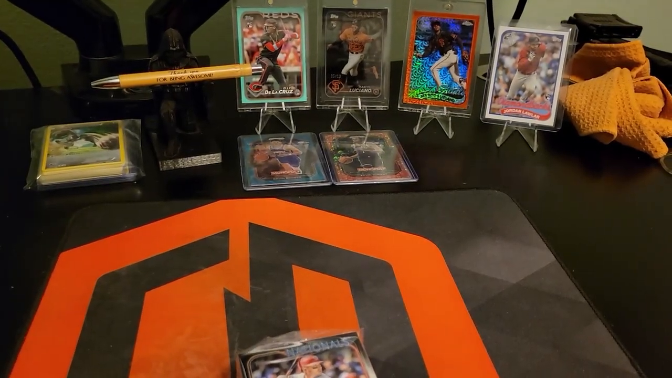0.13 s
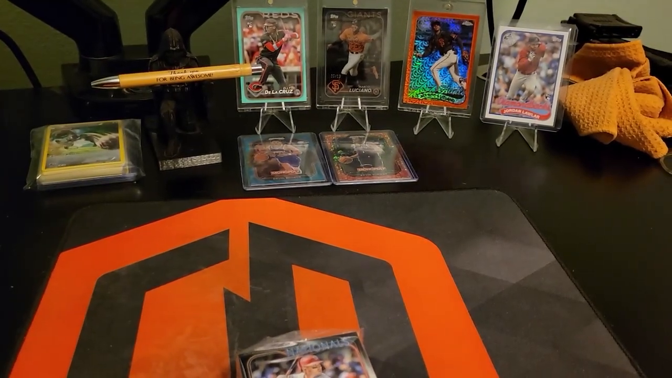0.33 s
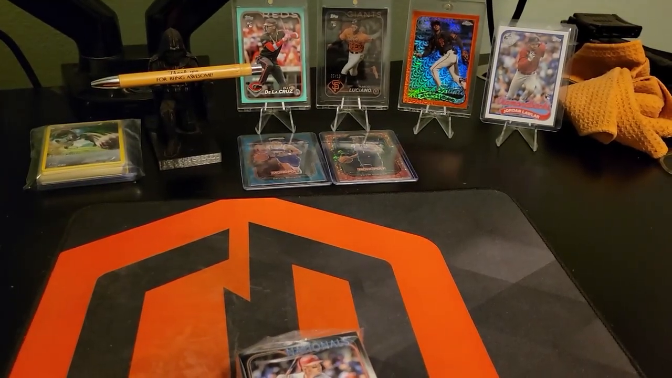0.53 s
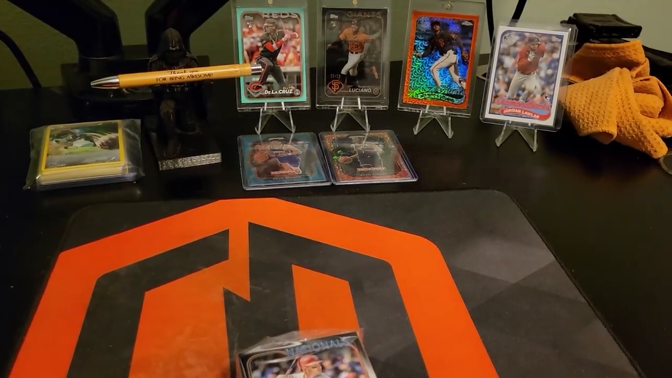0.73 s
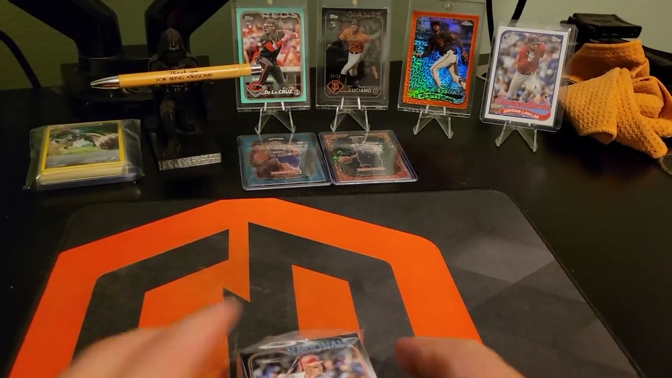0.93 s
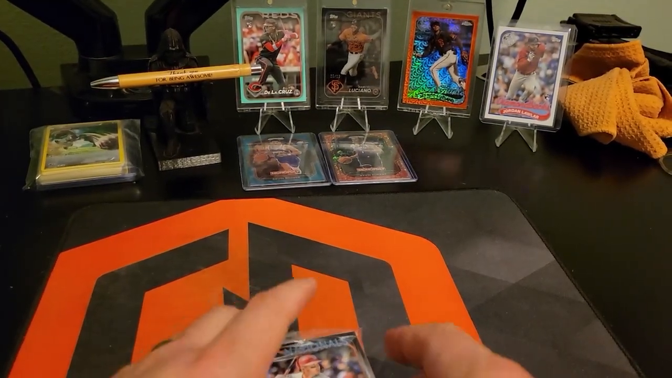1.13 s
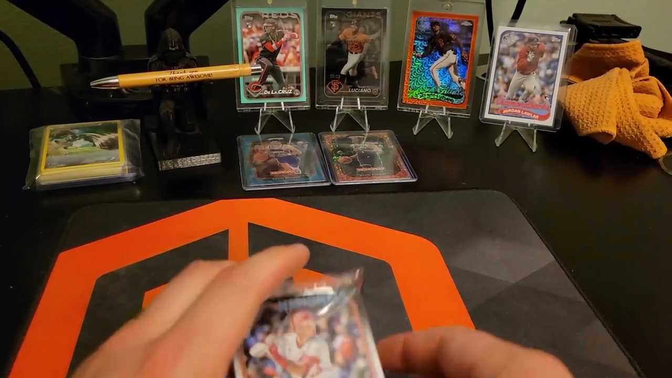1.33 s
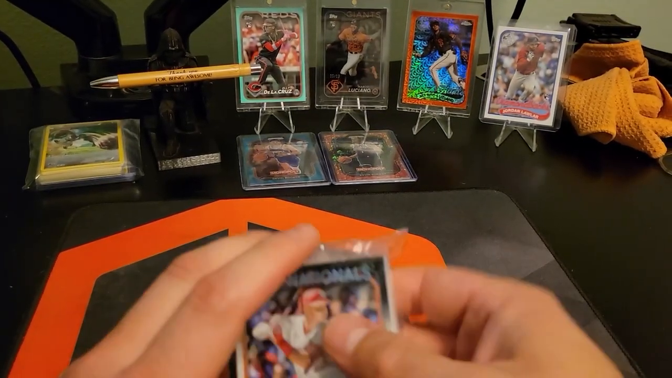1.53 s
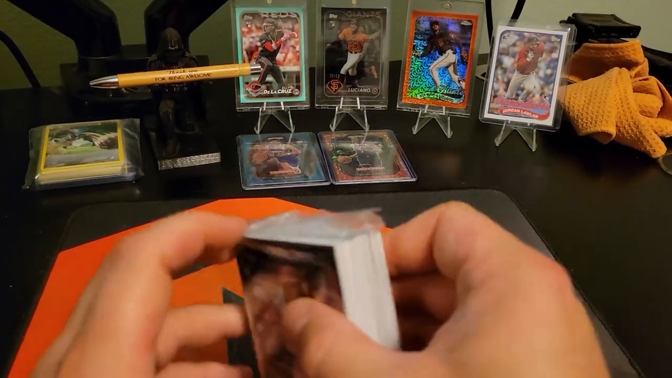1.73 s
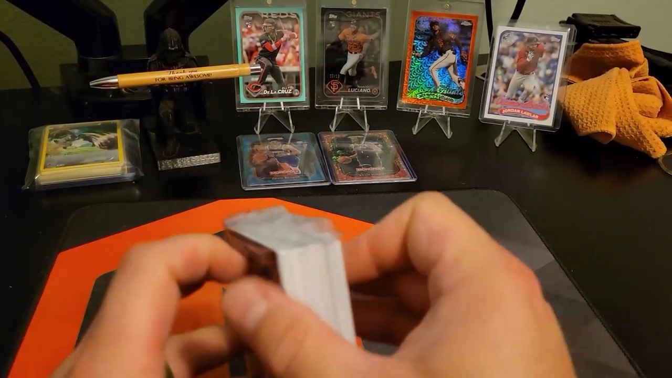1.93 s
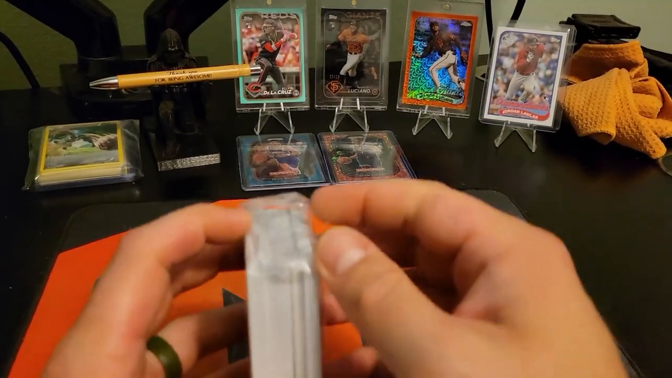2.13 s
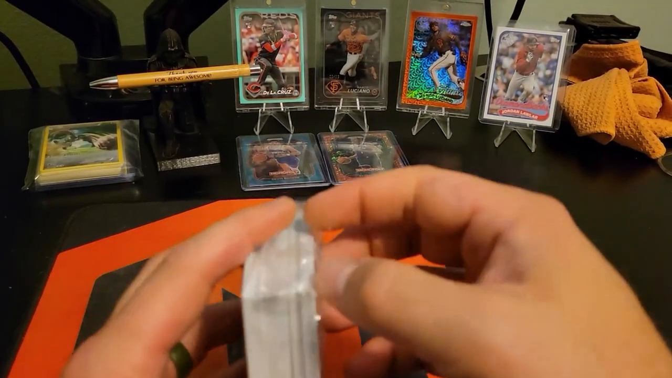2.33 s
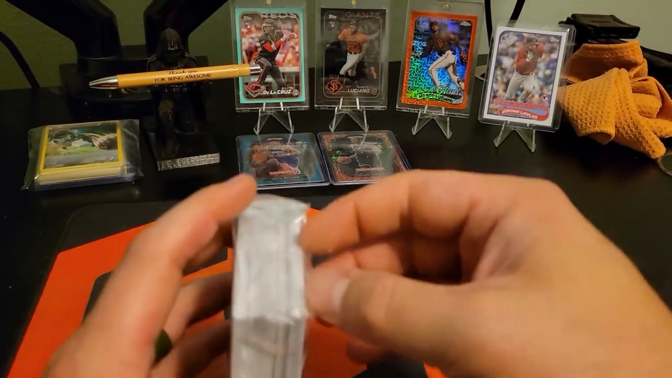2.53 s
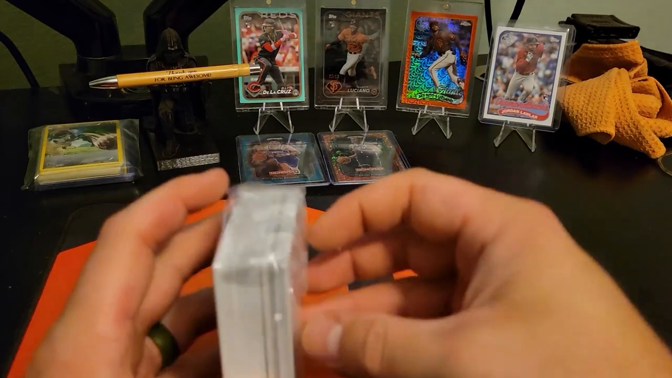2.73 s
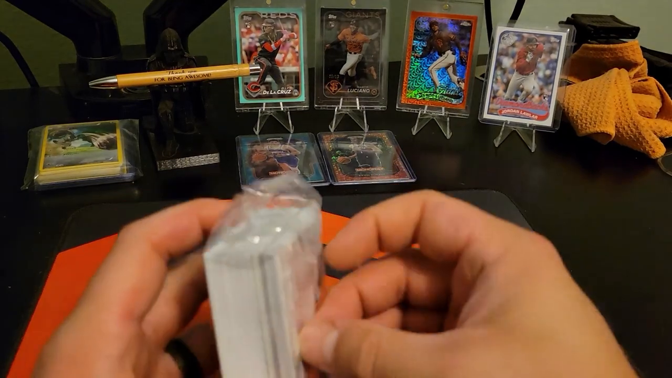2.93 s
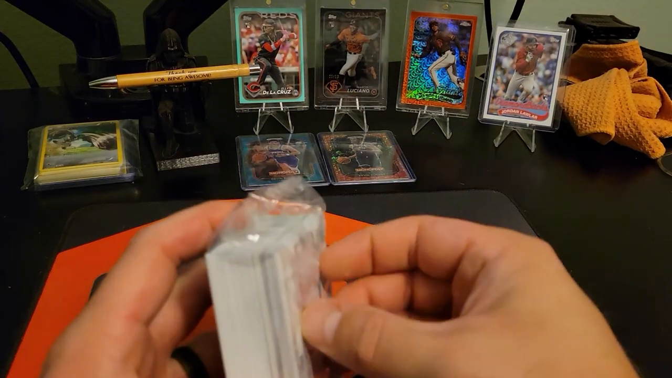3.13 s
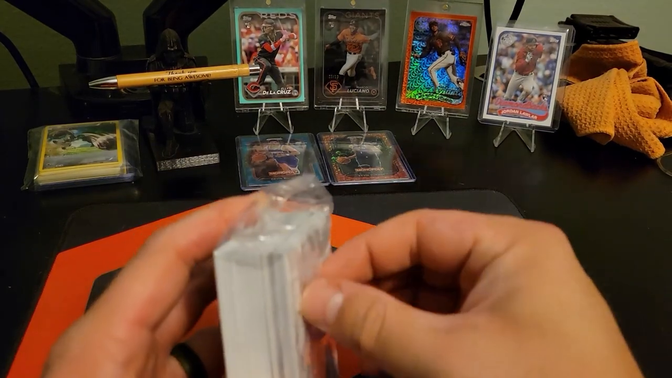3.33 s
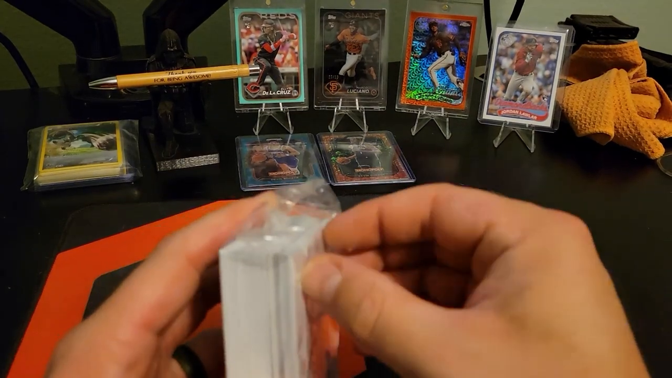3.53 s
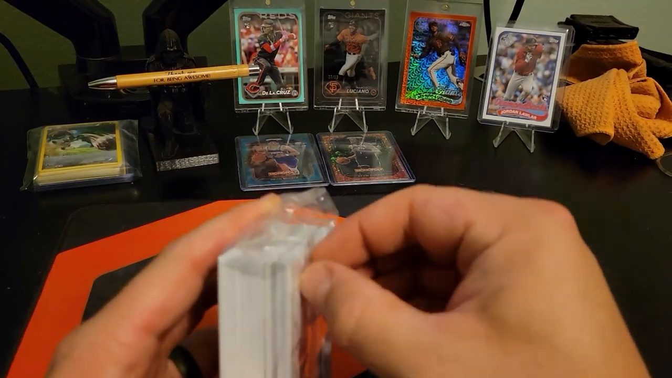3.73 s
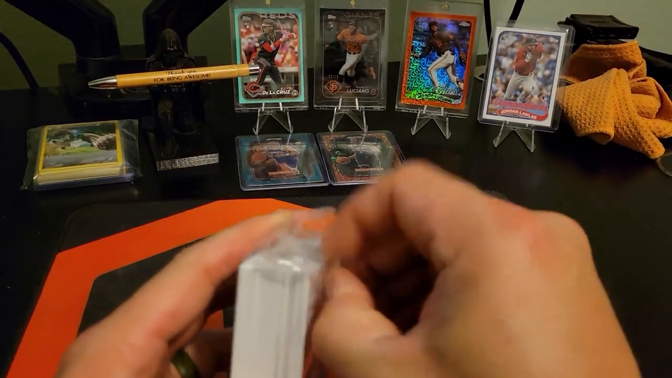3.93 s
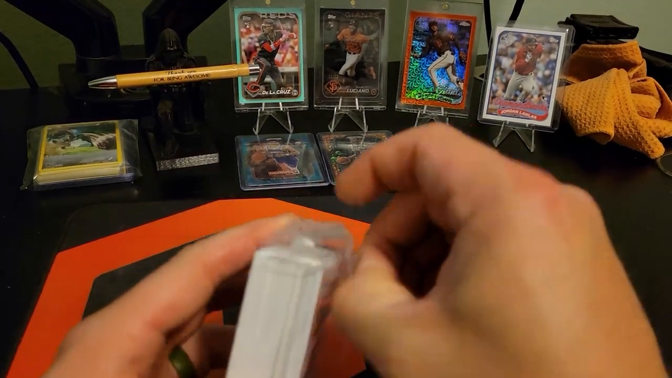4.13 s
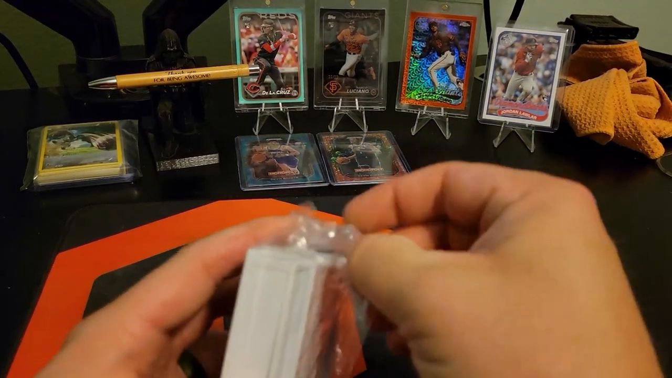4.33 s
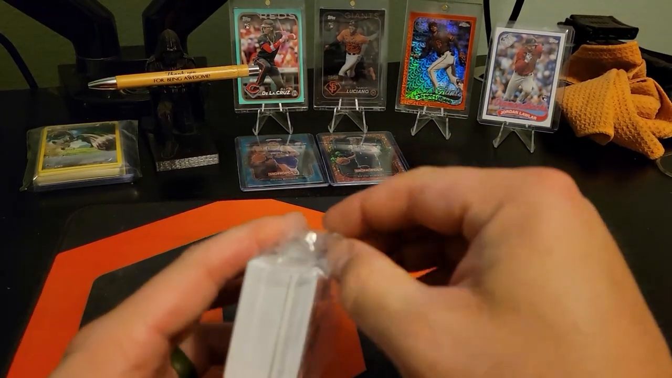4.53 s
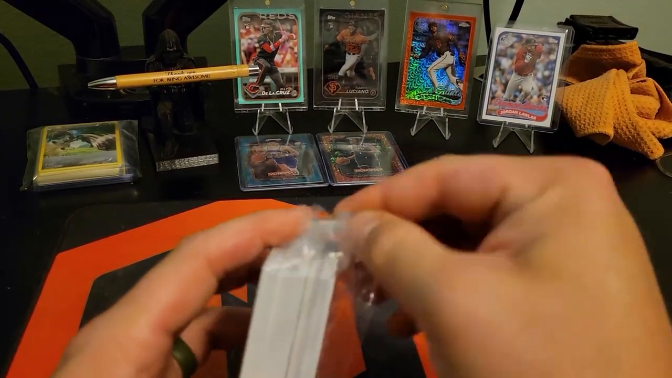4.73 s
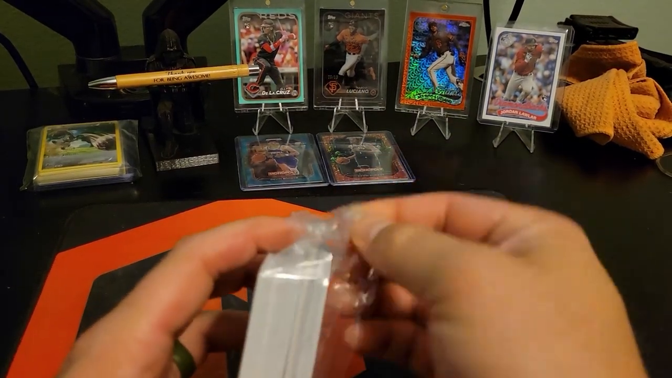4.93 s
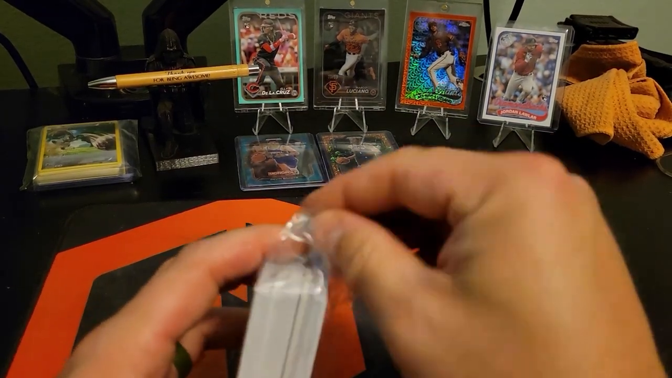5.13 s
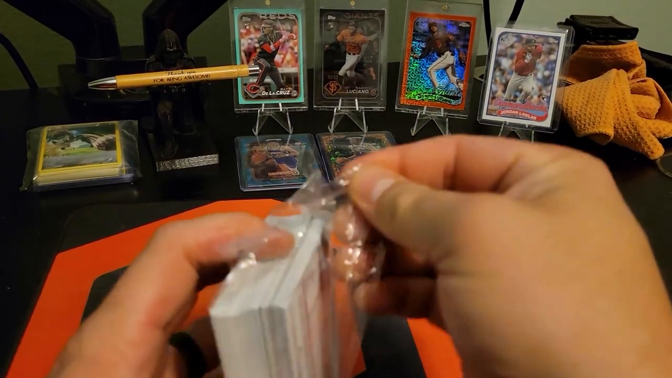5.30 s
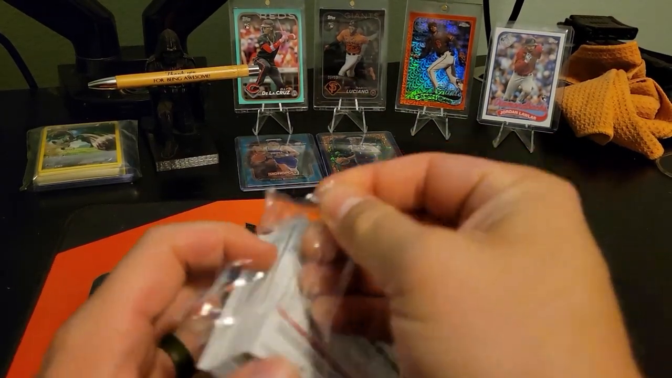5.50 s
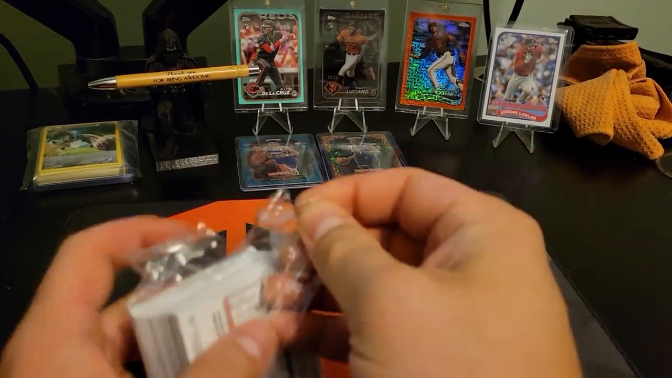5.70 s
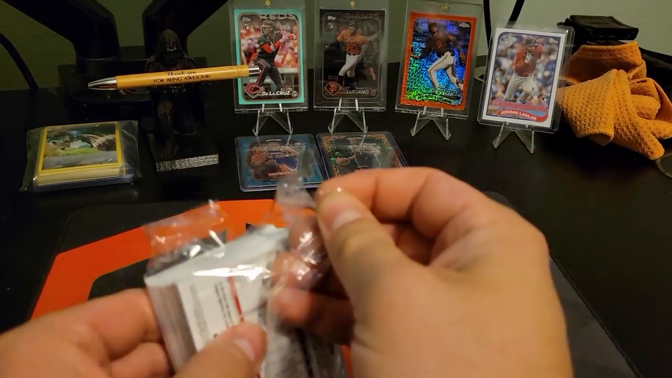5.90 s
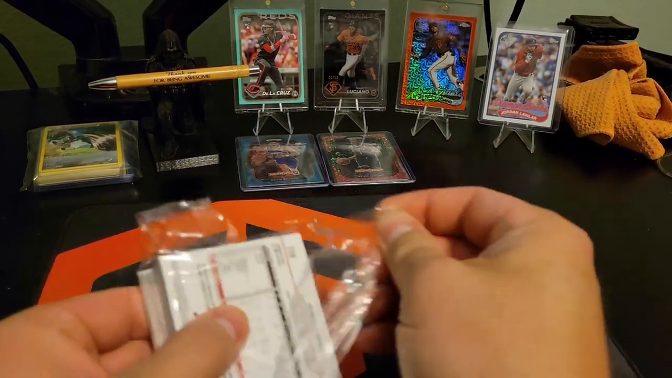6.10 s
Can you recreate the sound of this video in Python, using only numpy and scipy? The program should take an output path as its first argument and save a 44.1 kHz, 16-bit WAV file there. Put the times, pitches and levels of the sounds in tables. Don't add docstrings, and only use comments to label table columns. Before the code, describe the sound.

A card pack scrapes briefly across a desk mat, then thin plastic wrap crackles and snaps, growing from faint ticks to loud, dense tearing.

```python
import sys
import numpy as np
from scipy import signal
from scipy.fft import rfft, irfft
from scipy.io import wavfile
from scipy.ndimage import uniform_filter1d

SR = 44100
rng = np.random.default_rng(int(sys.argv[2]) if len(sys.argv) > 2 else 0)


def waveform_to_disk(signal):
    frames = np.transpose(np.atleast_2d(signal))
    scaled = np.clip(frames, -1, 1) * 32767
    samples = np.round(scaled).astype(np.int16)
    wavfile.write(sys.argv[1], SR, samples)


def boost_factor(decibels):
    exponent = np.asarray(decibels, float) / 20
    return 10 ** exponent


N = 271656
GRAIN = 512
SNAP_PAN_DB = 2


# (t/s, peak level/dB, deep part level/dB, middle
# part level/dB)
SNAPS = [(0.9328, -45, 0, 7), (0.958, -40.5, -29, -4), (1.007, -31.5, -19, -14), (1.04, -27, -4, -7),
         (1.1388, -26, -12, -3.5), (1.193, -30.5, -1, 4), (1.225, -25, -5, 0.5), (1.273, -38.5, 5, -1),
         (1.3132, -32.5, -22, -8), (1.35, -31, -3, -13), (1.397, -19.5, -8.5, -16.5),
         (1.477, -35, -27, 6), (1.483, -27.5, -36, -12), (1.5173, -24, -28, -19),
         (1.539, -20.5, -17, -6.5), (1.568, -11.5, -53, -12), (1.619, -18.5, -16, -20),
         (1.704, -25.5, -23, -26.5), (1.719, -18, -22, -4), (1.789, -30, -27, -5), (1.872, -39, -6, -18),
         (1.912, -31, -8.5, -15), (1.999, -27, -6.5, -14), (2.0204, -24.5, -16, 1.5),
         (2.056, -13, -29, -9.5), (2.0752, -25, -19, -9), (2.095, -19, -16, -10), (2.1044, -23, -37, -7),
           (2.189, -32, 0, -2), (2.2194, -26.5, -9.5, -4.5), (2.248, -20, -18, -3),
           (2.2951, -20.5, -14, -6.5), (2.334, -20, -22, -6), (2.366, -30, -49, 2),
           (2.3797, -17.5, -27, -4), (2.3981, -16.5, -4, -17), (2.4306, -12.5, -15, -12),
           (2.445, -17.5, -35, -10), (2.4717, -13, -13, -5), (2.531, -17.5, -13.5, -13),
           (2.559, -11.5, -31, -15), (2.5747, -15.5, -26, -13), (2.5926, -18, -29, -10),
           (2.6107, -20.5, -14, -11), (2.6871, -17, -19, -9.5), (2.6957, -21.5, -20, -4),
           (2.7278, -22, -17.5, 3), (2.793, -22.5, -16, -13.5), (2.8103, -15, -18, -4),
           (2.8959, -28.5, -8.5, 4),
         (2.976, -15, -6, -12.5), (2.9955, -11.5, -26, -17), (3.0279, -20.5, -9.5, -5),
           (3.116, -16, -35, -5.5), (3.1245, -17, -27, -16), (3.149, -10.5, -40, -23),
           (3.158, -15, -12, -3), (3.211, -18, -0.5, -12), (3.2817, -18, -13, -4),
           (3.3813, -18.5, -25, -22), (3.3923, -30.5, -8.5, 5), (3.4458, -25, -14, 12),
           (3.48, -23.5, -10, 1), (3.4925, -14, -26, -10), (3.5161, -9, -14, -5), (3.5557, -21, -23, -5),
           (3.59, -13.5, -26.5, -2.5), (3.727, -27, -32, -33), (3.764, -22, -48, -15),
           (3.786, -19, -44, -30), (3.7988, -23.5, -12, -1.5), (3.8189, -12.5, -45, -20),
           (3.8759, -24.5, -14, -2), (3.923, -17, -18.5, -6), (3.959, -20, -13, 0.5),
           (3.976, -19.5, -6.5, 2),
         (4.0285, -15, -19.5, -4.5), (4.038, -17.5, -33, -3), (4.0624, -24, -5, 11),
           (4.102, -17.5, -16, -1), (4.119, -13.5, -28, -13), (4.147, -16.5, -34, 2), (4.185, -26, 4.5, 6),
           (4.2042, -22, -17, 8), (4.213, -10, -19, -21), (4.225, -16.5, -1.5, 8.5), (4.256, -14, -3, 0.5),
           (4.289, -10.5, -25, -35), (4.331, -18, -22, -20), (4.3482, -17.5, -15, -13),
           (4.3625, -14.5, -23, -18), (4.4171, -16, -50, -18), (4.478, -18.5, -8, -6),
           (4.518, -17.5, -19, -1.5), (4.5375, -8.5, -13, -11.5), (4.5858, -21.5, -22, -12),
           (4.6586, -14.5, -26, -38), (4.691, -27.5, -11, 5), (4.7272, -13.5, -9, 2.5), (4.74, -9, -24, -8),
           (4.7524, -19.5, -2.5, 10.5), (4.7825, -14, -14, -1), (4.831, -18.5, -4, 4),
           (4.8445, -9, -28, -13), (4.945, -11, -29, -16), (4.9782, -10.5, -27, -27),
         (5.0029, -23.5, 8, 9), (5.031, -9, -28, -32), (5.0513, -15, -10, -12), (5.0735, -12.5, -33, -12),
           (5.1186, -18.5, -15, 3), (5.188, -18, -34, -28), (5.2173, -15.5, -8.5, 4),
           (5.241, -8, -13, -1.5), (5.2741, -14.5, -17, -6), (5.3294, -18.5, -34, -33),
           (5.365, -22.5, -0.5, 7), (5.3788, -18, -27, -18), (5.401, -15.5, -13, -3), (5.4641, -22, -8, -1),
           (5.524, -21, -15, -8), (5.583, -19.5, -17, -8.5), (5.598, -17, -12.5, -3),
           (5.6293, -24, -5.5, 5), (5.6538, -24, -49, 13.5), (5.7354, -14, -16, -10), (5.819, -25, -27, -7),
           (5.834, -15, -14, -3), (5.874, -17.5, -10.5, -12), (5.9198, -22, -21, -8),
           (5.934, -21, -36, -21), (5.955, -12.5, -21, 0), (5.999, -12, -31, -14), (6.07, -6, -12, -14),
           (6.0949, -5.5, -1.5, -16), (6.1108, -6, -27, -11.5)]


def snaps():
    rows = np.transpose(SNAPS)
    pan_db = SNAP_PAN_DB + rng.standard_normal(rows.shape[1])
    return creases(*rows, pan_db, fade_s=0.0015, sparse=0.45, patchy_db=2.0)


def swarm():
    when, size, side = rng.random((3000, 3)).T
    t = np.arange(.88, N / SR, .002)
    crowding = .2
    rate = boost_factor(2 * crowding * squeezing(t)[0])
    when = np.interp(when, np.cumsum(rate) / rate.sum(), t)
    swarm_db, deep_db = squeezing(when)
    share_db = swarm_db - 10 * np.log10(np.interp(when, t, rate) / rate.mean())
    db = share_db - 5.0 - 3.48 * np.log(size + 0.039)
    middle_db = -4.5 - 0.3123 * (swarm_db + 35.5)
    deep_own, middle_own = 2.87 * rng.standard_normal((len(when), 2)).T
    pan_db = 8 * (side - .5)
    return creases(when, db, deep_db + deep_own, middle_db + middle_own, pan_db,
                   fade_s=0.00072, sparse=0.65, patchy_db=6.5)


# (peak t/s, level/dB, rise t/s, die-away t/s, deep
# part level/dB)
SQUEEZES = [(1.033, -43, 0.057, 0.065, -11), (1.16, -50, 0.065, .3, -3.5), (1.24, -45, .09, .12, -2),
            (1.41, -59.5, 0.093, 0.24, 9), (1.611, -30.5, 0.15, 0.062, -13), (1.731, -34.5, 0.074, 0.1, -11),
            (2.065, -33.5, .1, 0.29, -10.5), (2.241, -36, 0.17, 0.076, -10), (2.46, -26, 0.14, 0.069, -14),
            (2.567, -34.5, 0.15, 0.14, -10), (2.76, -41, 0.41, 0.22, -12), (2.905, -30, 0.049, 0.038, -13.5),
            (2.987, -31.5, 0.038, 0.083, -15), (3.122, -31, 0.021, 0.13, -11.5), (3.3, -35.5, .06, .25, -11),
            (3.525, -33, 0.13, .2, -12.5), (3.807, -35.5, 0.055, 0.077, -13.5),
            (3.922, -34.5, 0.03, 0.37, -17),
            (4.111, -23.5, 0.093, 0.14, -12.5), (4.23, -28.5, 0.17, 0.23, -8.5), (4.43, -33.5, .1, .45, -14),
        (4.722, -27, .05, 0.095, -47), (4.772, -17.5, .12, .04, -6.5), (4.858, -14, 0.034, 0.043, -9.5),
        (5.075, -24, 0.18, 0.11, -7), (5.255, -16, 0.096, 0.044, -10.5), (5.471, -36, .4, 0.15, -11.5),
        (5.668, -30, 0.071, 0.05, -7.5), (5.744, -39, 0.095, 0.073, -13), (5.838, -39, 0.035, 0.069, -4),
        (5.953, -26, 0.064, 0.22, -13), (6.062, -14.5, 0.094, 0.69, -12), (6.15, -21, 0.17, .3, 10)]


def squeezing(t):
    s, db, rise, fall, deep_db = np.transpose(SQUEEZES)[:, :, None]
    swell_db = 20
    away = np.where(t < s, (s - t) / rise, (t - s) / fall)
    power = boost_factor(2 * (db - swell_db * away))
    total = power.sum(axis=0)
    return 10 * np.log10(total), (power * deep_db).sum(axis=0) / total


# (t/s, peak level/dB, deep part level/dB, middle
# part level/dB)
TICKS = [(0.9982, -39, -26, -12), (1.0197, -30.5, -22, -7), (1.165, -31.5, -18, 1),
         (1.6113, -20, -20, -22), (1.6165, -23.5, -5.5, -19), (1.9252, -30.5, -10, -11),
         (2.101, -21, -20, -13), (2.1239, -28.5, -36, -2), (2.13, -29, -28, 9),
         (2.2251, -19, -19, -17), (2.232, -26, -40, -14), (2.262, -21, -21, -15),
         (2.36, -24, -32, -17), (2.3744, -22, -15.5, -4), (2.4138, -17, -35, -3),
         (2.5003, -24, -20, -10), (2.5344, -22, -16, -6), (2.5403, -18, -34, -29),
         (2.5542, -14, -24, -11.5), (2.5652, -26, -7, -3), (2.6617, -24.5, -26, -4),
         (2.7016, -23, -25, -24), (2.7316, -29, -21, -2), (2.7408, -27, -29, -12), (2.9, -22, -20, 4),
         (2.915, -26, -19, -12), (3.1369, -22, -33, -16), (3.1614, -15, -17, -8),
         (3.171, -19, -26, -23), (3.2888, -26, -7.5, 9), (3.349, -31, -18, -7),
         (3.486, -21.5, -19, -5), (3.5041, -23, -22, 1), (3.5327, -17, -26, -14),
         (3.586, -26.5, -20, 7), (3.6037, -22, -25, -15), (3.61, -20, -24, -12),
         (3.6294, -23, -17.5, -6),
         (3.6535, -26, -12, -10), (3.717, -33.5, -12, -8), (3.768, -31, -31, -23),
                (3.812, -27, -26, -4), (3.8586, -35, -30, -25), (3.9176, -25, -9, -1),
                (3.9283, -25, -38, -20), (3.9497, -23, -31, -10), (4.072, -22, -24, -19),
                (4.107, -15, -12, -24), (4.137, -27, -3, 0), (4.157, -26, -15, -8), (4.162, -36, -22, -8),
                (4.22, -25, -6, -6), (4.2437, -19, -25, -19), (4.2625, -28, -6, 13), (4.274, -21, -7, 0),
                (4.2825, -15, -21, -19), (4.324, -22.5, -24, 0), (4.37, -26, -23, -5),
                (4.4228, -24, -36, -14), (4.447, -29, -21, -28), (4.47, -27, 2.5, -2),
                (4.704, -18.5, -20, -1), (4.7181, -15.5, -12, 6), (4.7317, -26, -8, -5),
                (4.765, -12.5, -14, -13), (4.809, -16, -4, -4), (4.8496, -10, -2.5, -4),
                (4.8705, -13, -5, 2), (4.8857, -33, -15, -2), (4.9288, -19, -9, -8),
                (4.993, -18.5, -17, -10), (5.006, -25.5, -7, 8), (5.0122, -19.5, -4, 6.5),
         (5.018, -32, -12, 10), (5.0572, -19.5, -4, 1), (5.0647, -11, -8.5, -4), (5.078, -25, -16, -5),
              (5.083, -16, -23, -13), (5.091, -11, -15.5, 0), (5.098, -29, -16, 3), (5.122, -17.5, -18, -8),
              (5.1575, -18.5, -10.5, 1.5), (5.169, -33, -13, -3), (5.2143, -18.5, -27, 4),
              (5.222, -18, -3, -9), (5.231, -23, -8, 9.5), (5.2544, -10.5, -9, -3), (5.2687, -13, -10, -13),
              (5.469, -27, -14, -10), (5.4765, -32, -28, -3), (5.4821, -30, -16, -11),
              (5.496, -37, -17, -16), (5.678, -30, -17, 10), (5.725, -27.5, -39, 2),
              (5.7593, -30, -31, -19), (5.838, -24, -8, -7), (5.9634, -25, -1, -7), (5.9864, -15, -21, -13),
              (6.028, -7, -30, -21), (6.0373, -14, -26.5, -16.5), (6.0422, -12, -20, -15),
              (6.047, -17, -20, -27), (6.051, -6, -39, -19), (6.062, -8, -27, -23), (6.067, -13, -9, -24),
              (6.085, -6, -15, -18), (6.101, -12, -29, -20), (6.117, -11, -25, -23), (6.125, -6, -27, -18),
              (6.134, -12, -25, -22), (6.143, -10.5, -23, -21)]


def separate_ticks():
    return ticks(TICKS)


# (t/s, peak level/dB, deep
# part level/dB, middle part level/dB)
MORE_TICKS = [
    (1.365, -44, 10, 6),
    (1.437, -40.5, 6, -6),
]


def more_ticks():
    return ticks(MORE_TICKS)


def ticks(table):
    rows = np.transpose(table)
    pan_db = SNAP_PAN_DB + rng.standard_normal(rows.shape[1])
    return creases(*rows, pan_db, fade_s=0.0012, sparse=0.65, patchy_db=6.5)


# (f/Hz, level/dB)
FILM = [(130, -39), (450, -18), (1100, -9), (1800, -1.5), (2400, -1.5), (3250, 6.5), (4000, 2), (6500, 4.5),
        (15000, 0)]
# (t/s, left over right level/dB)
HANDS_PAN = [
    (1.2, -2.5),
    (1.75, 0),
    (2.25, 0.5),
    (3.2, -3),
    (4.2, 0.7),
    (4.75, -0.5),
    (5.5, -0.5),
]


def creases(s, db, deep_db, middle_db, pan_db, fade_s, sparse, patchy_db):
    peak_s = .003
    t, hz = np.arange(GRAIN) / SR - peak_s, np.fft.rfftfreq(GRAIN, 1 / SR)
    chance = rng.standard_normal((len(s), 4, GRAIN))
    fade = fade_s * np.exp(.3 * chance[:, 3, :1])
    away = np.where(t < 0, -1.07 * t, t)
    slips = np.exp(sparse * chance[:, 2] - away / fade)
    slips *= 1 + 1.24 * np.exp(-np.abs(t) / 0.0002)
    burst = apart(slips * chance[:, :2].transpose(1, 0, 2), alike_hz=4100)
    patch = uniform_filter1d(uniform_filter1d(chance[:, 3, :len(hz)], size=11), size=11)
    colour = curve(FILM, hz) + patchy_db * unit(patch)
    deep = 1 / (1 + (hz / 2000) ** 4)
    high = 1 / (1 + (5500 / (hz + 1)) ** 6)
    parts = np.array([deep, 1 - deep - high, high])
    power = (np.abs(rfft(burst)) ** 2).mean(axis=0) * boost_factor(2 * colour)
    given_db = 10 * np.log10(power @ parts.T / GRAIN)
    wanted_db = db[:, None] + np.c_[deep_db - 1.1, middle_db - .6, 0 * db] + 12.5
    grains = causal(burst, colour + (wanted_db - given_db) @ parts)
    pan_db = pan_db + np.interp(s, *np.transpose(HANDS_PAN))
    start = np.round((s - peak_s) * SR).astype(int)
    at = (start[:, None] + np.arange(GRAIN)).ravel()
    ports = []
    for grain, side in zip(grains, (1, -1)):
        panned = grain * boost_factor(side * pan_db / 2)[:, None]
        ports.append(np.bincount(at, panned.ravel(), N + GRAIN)[:N])
    return np.array(ports)


# (t/s, peak level/dB, f/Hz, 60 dB fade t/s)
POPS = [
    (1.26, -49, 865, 0.025),
    (1.27, -29.5, 1500, 0.007),
    (4.134, -32, 1300, .018),
    (4.223, -15.5, 1800, 0.024),
    (5.627, -27, 1680, .015),
]


def pops():
    return knocks(POPS)


# (t/s, peak level/dB, f/Hz, 60 dB fade t/s)
BUMPS = [
    (0.263, -37, 523, 0.2),
    (.447, -52.5, 350, 0.21),
    (.542, -41, 179, 0.29),
    (2.622, -42, 120, 0.018),
    (2.704, -55.5, 45.4, 0.16),
    (2.809, -28, 696, 0.0028),
    (3.001, -56, 82.7, 0.11),
    (4.099, -31.5, 335, 0.023),
    (5.674, -42.5, 180, 0.067),
    (6.048, -43, 200.5, 0.11),
]


def bumps():
    return knocks(BUMPS)


def knocks(table):
    out, t = np.zeros(N + SR), np.arange(SR // 2) / SR
    grown = np.minimum(t / .02, 1)
    for s, db, hz, t60 in table:
        drift = rng.standard_normal((2, len(t)))
        size, phase = [unit(uniform_filter1d(uniform_filter1d(v, size=300), size=300)) for v in drift]
        ring = np.sin(2 * np.pi * hz * t + 0.47 * grown * phase) * boost_factor(5.5 * grown * size)
        ring *= np.exp(-np.log(1000) * t / max(t60, .002))
        ring *= 1 - np.exp(-t / min(0.036 * t60, .004))
        out[int(s * SR):][:len(t)] += boost_factor(db - 0.5) * ring
    return out[:N]


def card_stack(near):
    hum = signal.lfilter(*signal.iirpeak(357, 8, fs=SR), near)
    return boost_factor(0.5) * hum * (np.arange(N) > SR)


# (t/s, desk shake level/dB, scrape level/dB)
PUSH = [
    (0.023, -67, -68),
    (0.039, -48.5, -41.5),
    (0.08, -33.5, -50),
    (.12, -32.5, -61),
    (.15, -37, -41.5),
    (.21, -47.5, -43.5),
    (0.283, -40.5, -44),
    (.372, -56.5, -56.5),
    (.434, -62.5, -59),
]
NUDGE = [
    (.495, -60, -54.5),
    (.515, -49, -50),
    (.555, -51.5, -57),
    (.6, -63.5, -63.5),
    (.75, -93, -99),
]
# (f/Hz, width f/Hz, level/dB)
DESK = [(147.4, 16, 4.5), (180, 5.4, 7), (222.5, 6.5, 6.5), (260, 30, 4), (300, 40, -2), (347, 33, 2),
        (523, 180, 0), (755, 420, -3), (1370, 460, -8.5)]
# (f/Hz, level/dB)
MAT = [(290, -47), (500, -28), (994, -26), (3210, -25), (7820, -32), (12700, -29.5), (15800, -34.5)]


def slide():
    ts, shake_db, scrape_db = np.transpose(PUSH + NUDGE)
    t = np.arange(N) / SR
    rough = rng.standard_normal(N) * boost_factor(2.5 * unit(uniform_filter1d(rng.standard_normal(N), size=600)))
    push_db = np.clip(np.interp(t, ts, shake_db) + 38, 0, None)
    desk = np.zeros(N)
    for hz, width, db in DESK:
        mode = signal.lfilter(*signal.iirpeak(hz, hz / width, fs=SR), rough)
        tilt_db = 0.28 * push_db * np.log2(hz / 250)
        desk += boost_factor(db + tilt_db) / np.sqrt(width) * mode
    desk = signal.lfilter(*signal.butter(2, 70, "high", fs=SR), desk)
    shake = unit(desk) * boost_factor(np.interp(t, ts, shake_db, left=-120, right=-120))
    scrape = boost_factor(np.interp(t, ts, scrape_db, left=-120, right=-120) + 4.5)
    return from_left(shake) + stereo_noise(MAT, alike_hz=690) * scrape


def from_left(x):
    lag = 12
    return np.array([x, np.r_[np.zeros(lag), x[:-lag]]])


# (t/s, rumble level/dB, half length t/s)
WRISTS = [
    (1.164, -69.5, 0.12),
    (2.718, -72, 0.093),
    (2.99, -69, 0.064),
    (5.973, -64, 0.069),
]


def wrists():
    t, top_hz = np.arange(N) / SR, 169
    band = signal.butter(1, [top_hz / 3, top_hz], "band", fs=SR)
    rumble = signal.lfilter(*band, rng.standard_normal(N))
    shake = boost_factor(5.8 * unit(uniform_filter1d(rng.standard_normal(N), size=900)))
    rubs = sum(boost_factor(db) * np.exp(-((t - s) / half) ** 2) for s, db, half in WRISTS)
    return unit(rumble * shake) * rubs


def room(near):
    t = np.arange(SR // 2) / SR
    early_t60_s, late_t60_s, late_db = 0.1, 0.45, -8
    fade = boost_factor(-60 * t / early_t60_s) + boost_factor(late_db - 60 * t / late_t60_s)
    wash = rng.standard_normal((2, len(t))) * fade * (1 - np.exp(-t / 0.00071))
    wash = signal.lfilter(*signal.butter(1, 11900, fs=SR), apart(wash, alike_hz=1210))
    wash = signal.lfilter(*signal.butter(1, 700, "high", fs=SR), wash)
    wash *= boost_factor(-5.5) / np.sqrt(np.sum(wash ** 2) / 2)
    return signal.fftconvolve(near.mean(axis=0, keepdims=True), wash, axes=1)[:, :N]


# (f/Hz, level/dB)
AIR = [(30, -13), (60, -12), (85, -19), (125, -9.5), (200, -10.5), (300, -16.5), (420, -22), (600, -26),
       (1700, -29), (8600, -38.5), (15200, -22.5), (16500, -22)]
# (f/Hz, level/dB)
HUM = [(120, -85.5), (360.5, -80), (15418, -85)]


def background():
    t = np.arange(N) / SR
    wobble = boost_factor(4.9 * unit(uniform_filter1d(rng.standard_normal(N), size=2000)))
    hum = wobble * sum(np.sqrt(2) * boost_factor(db) * np.sin(2 * np.pi * hz * t) for hz, db in HUM)
    return stereo_noise(AIR, alike_hz=300) * boost_factor(-66) + hum


def stereo_noise(spectrum, alike_hz):
    hz = np.fft.rfftfreq(N, 1 / SR)
    noise = irfft(rfft(rng.standard_normal((2, N))) * boost_factor(curve(spectrum, hz)), N)
    return unit(apart(noise, alike_hz))


def apart(pair, alike_hz):
    hz = np.fft.rfftfreq(pair.shape[-1], 1 / SR)
    mid, side = rfft(pair[0]), rfft(pair[1]) * hz / np.hypot(hz, alike_hz)
    return irfft([mid + side, mid - side], pair.shape[-1])


def curve(table, hz):
    f, v = np.transpose(table)
    return np.interp(np.log(hz + 1), np.log(f + 1), v)


def causal(x, db):
    cep = irfft(db * np.log(10) / 20)
    half = cep.shape[-1] // 2
    cep[..., 1:half] *= 2
    cep[..., half + 1:] = 0
    return irfft(rfft(x) * np.exp(rfft(cep)), x.shape[-1])


def unit(x):
    return x / np.sqrt(np.mean(x ** 2))


def scene():
    near = snaps() + swarm() + separate_ticks() + pops() + bumps() + slide()
    near = near + card_stack(near)
    return near + room(near) + more_ticks() + wrists() + background()


def roll_off(x):
    return signal.sosfilt(signal.butter(12, 17000, fs=SR, output="sos"), x)


# (f/Hz, left level/dB, right level/dB)
PORTS = [(990, 5.5, 6), (2680, 1, 1.5), (7700, -2, 0), (8810, 4, -25), (9750, 3.5, -8.5), (12870, 4, 9.5),
         (17900, -1, -10.5)]


def record(dry):
    dry = np.pad(dry, ((0, 0), (0, GRAIN)))
    hz = np.fft.rfftfreq(N + GRAIN, 1 / SR)
    f, *port_db = np.transpose(PORTS)
    coloured = causal(dry, np.array([np.interp(hz, f, db) for db in port_db]))
    right_lag, limit = 4.9, .9
    late = np.exp(-2j * np.pi * hz * right_lag / SR)
    ports = irfft(rfft(coloured) * [np.ones_like(late), late], N + GRAIN)[:, :N]
    rounded = limit * np.tanh(ports / limit)
    mix = signal.sosfilt(signal.ellip(9, .3, 50, 15900, fs=SR, output="sos"), rounded)
    return roll_off(mix)


dry = scene()
out = record(dry)
waveform_to_disk(out)
```